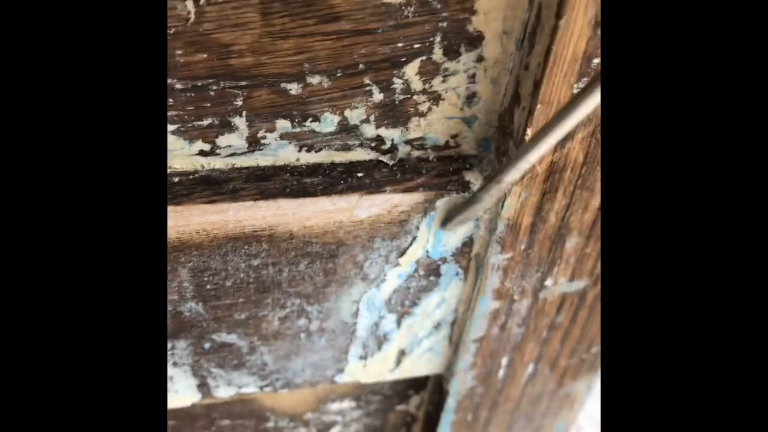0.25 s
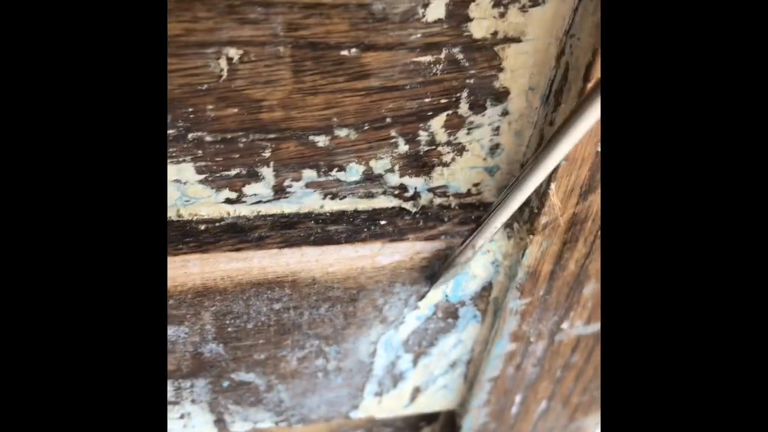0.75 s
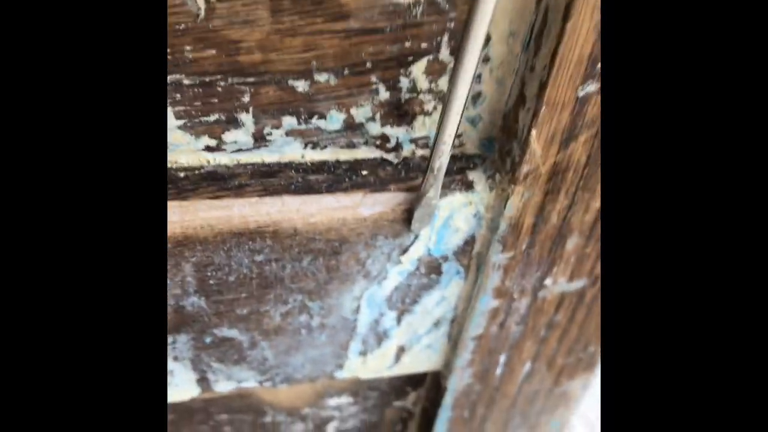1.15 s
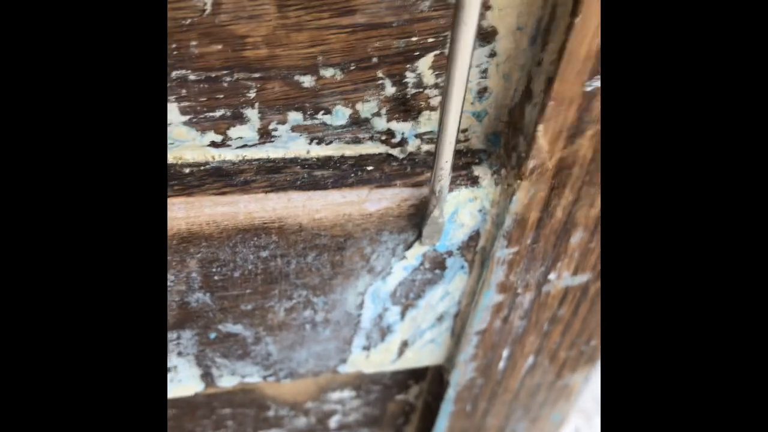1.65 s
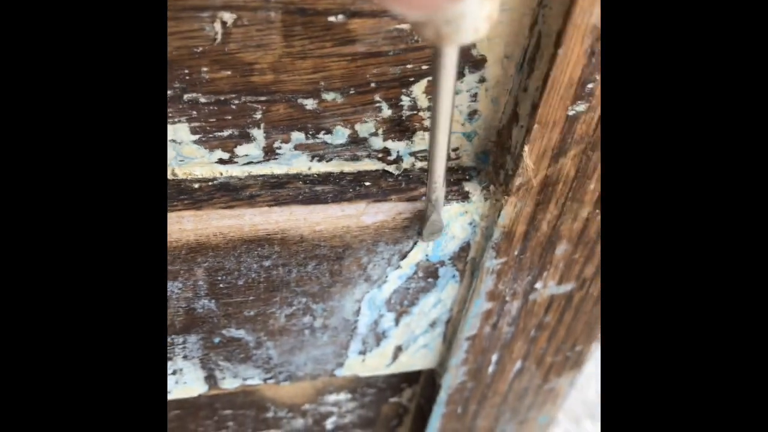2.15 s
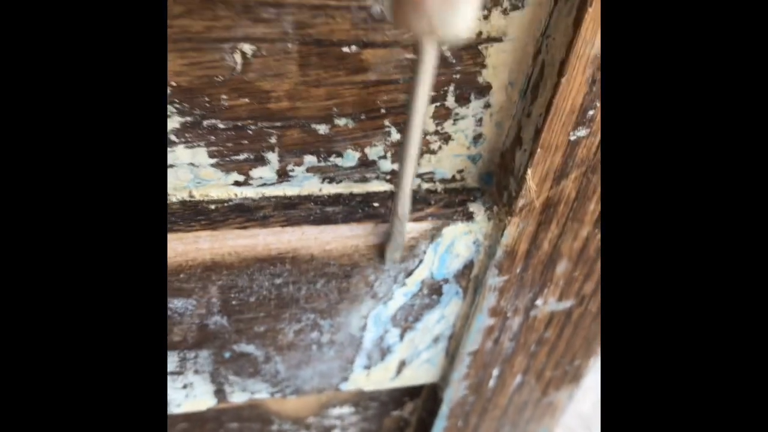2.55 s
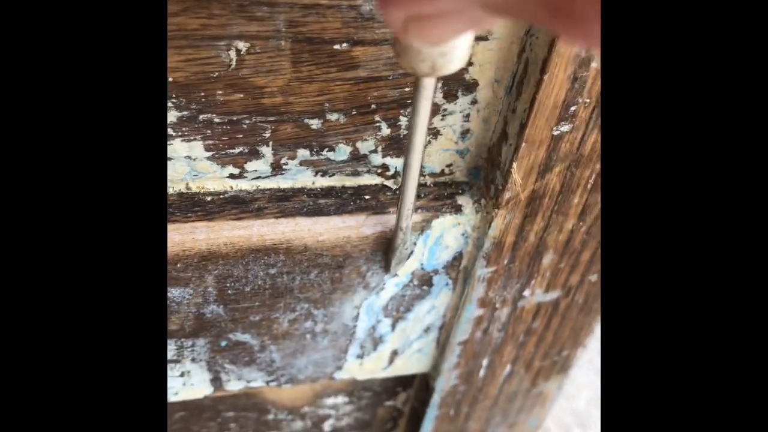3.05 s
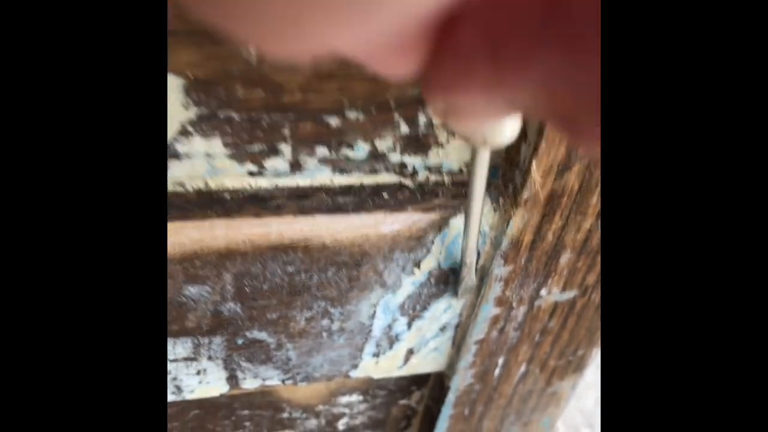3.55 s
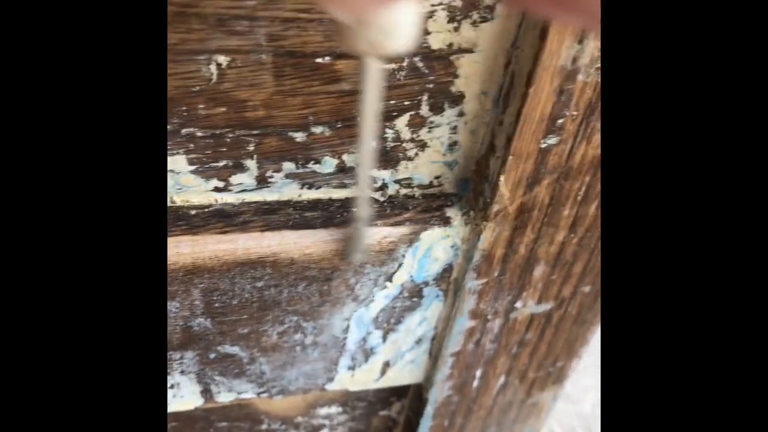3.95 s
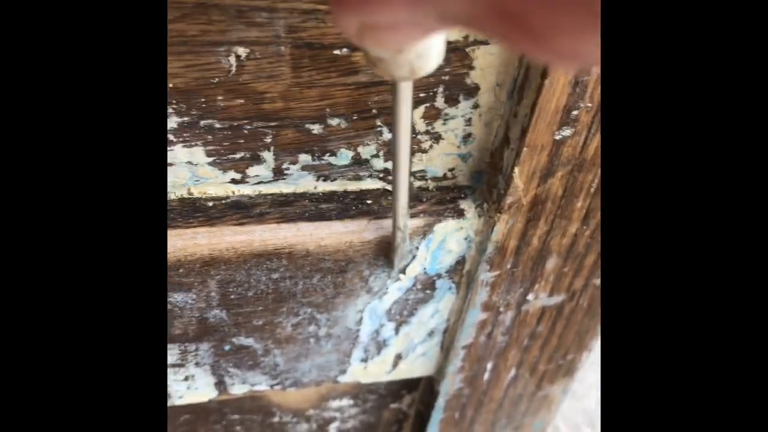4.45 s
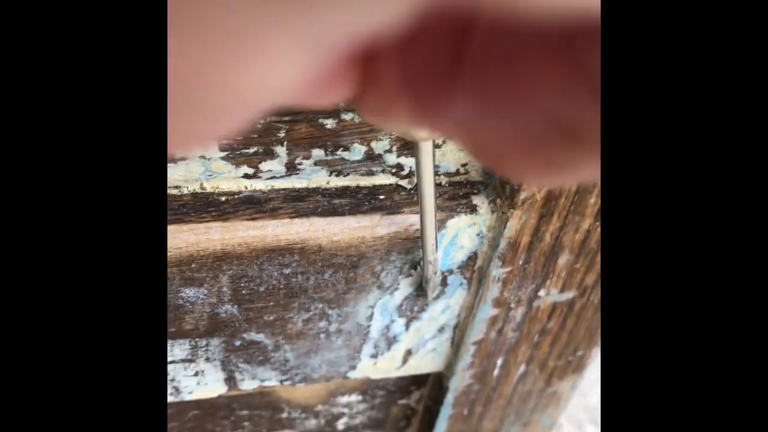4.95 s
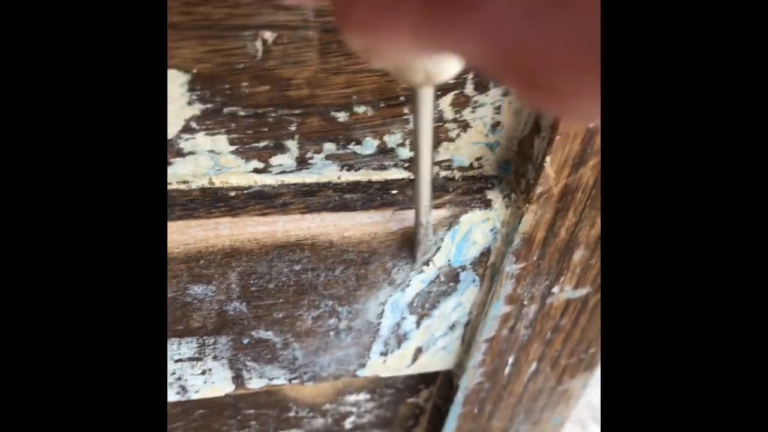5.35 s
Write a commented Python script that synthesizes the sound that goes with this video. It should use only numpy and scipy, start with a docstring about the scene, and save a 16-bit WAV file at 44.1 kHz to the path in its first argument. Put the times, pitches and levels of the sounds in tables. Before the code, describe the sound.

A pointed steel tool works at old paint on a wooden panel, heard very close in a quiet room. Faint jabs and dull knocks come first, then short gritty scrapes. Two harder knocks lead to cracking flakes; past the middle the point slips free with a loud, sharp snap. Smaller cracks and scrapes continue to the end over low hum and soft hand bumps.

```python
"""A pointed steel tool scrapes old paint off a wooden furniture panel, close by in a quiet room with hum and hiss.
A faint jab and a far peep open; dull, rubbed knocks follow as the tool is set down, then short gritty scrapes.
Two hard knocks lead into cracking flakes; past the middle the dug-in point slips free loudly with a big snap.
More flakes, jabs and scrapes follow to the end, over soft bumps and the clearest peep. Noise grains, cracks
and slips drive filters for paint, steel and wood; knocks are dispersed pulses, peeps are gliding sines."""
import sys
import numpy as np
from scipy import signal
from scipy.fft import rfft, irfft
from scipy.io import wavfile

SR = 44100
rng = np.random.default_rng(int(sys.argv[2]) if len(sys.argv) > 2 else 0)


def generate_wav(signal):
    """Clip the signal to [-1, 1] and save it as 16-bit WAV at the path in sys.argv[1]."""
    frames = np.transpose(np.atleast_2d(signal))
    scaled = np.clip(frames, -1, 1) * 32767
    pcm = np.round(scaled).astype(np.int16)
    wavfile.write(sys.argv[1], SR, pcm)


N = 247401
TIME_S = np.arange(N) / SR

# colour of the room's air: hz, gain_db
AIR_COLOUR = [(20, -23.5), (40, -8), (60, 11), (95, 0), (160, -2.5), (250, -6), (450, -9.5), (800, -17.5),
              (1600, -22), (3200, -25.5), (6300, -29.5), (9000, -30.5), (12000, -33), (16000, -36)]
AIR_DB = -62
HISS_DB, HISS_HZ, HISS_WIDTH_HZ = -78.5, 7640, 1060
# second harmonic of the hum, before HUM_GAIN_DB: time_s, level_db
HUM_SECOND = [(0.0, -57), (0.3, -60.5), (1.54, -71.5), (2.0, -63.5), (3.48, -66.5), (3.6, -70.5),
              (5.07, -61.5), (5.22, -56), (5.6, -61.5)]
MAINS_HZ, MAINS_DB, MAINS_WAVER_DB, HUM_GAIN_DB = 60.84, -68, 3, 1
# far peeps, before the direct and trail gains: start_s, pitch_hz, level_db, pitch_rise_share
FAR_PEEPS = [(.287, 2910, -72, .01), (1.069, 3100, -72.5, .01), (3.08, 3080, -71, .015),
             (4.326, 3080, -69, 0.018), (5.065, 3065, -63, .075)]
PEEP_LENGTH_S, PEEP_TRAIL_T60_S = 0.074, 0.2
ROOM_T60_S, ROOM_DB, ROOM_CUT_HZ = 0.099, -13.5, 1840
# soft bumps as the hand shifts its weight: start_s, level_db
HAND_BUMPS = [(.0, -47.5), (.298, -56.5), (1.041, -56.5), (1.304, -57.5), (1.809, -56.5), (1.976, -51),
              (2.909, -59), (3.182, -48), (4.037, -54.5), (4.164, -48.5), (4.49, -57), (4.604, -54.5),
              (4.882, -46.5), (4.94, -52), (5.33, -56), (5.507, -51)]
# colour of the bumps: hz, gain_db
BUMP_COLOUR = [(30, -36), (70, -9), (130, -2.5), (175, -3), (240, 7), (310, -10.5), (420, -10.5),
               (700, -28), (1500, -31), (4000, -53)]
BUMP_DECAY_S, WORK_RUMBLE_DB = 0.038, -56.5  # rumble left by a moderate stroke
# dull knocks as the tool is set down: start_s, peak_db
TOOL_KNOCKS = [(0.5297, -35), (0.6344, -33), (0.9579, -27), (1.2783, -30.5), (2.1022, -24), (2.2854, -18.5)]
# colour of a knock: pitch_multiple, gain_db
THUMP_COLOUR = [(.1, -18), (.3, -10), (.6, 2), (1, 5), (1.45, -0.5), (2.1, -10), (3, -30.5), (5, -40),
                (12, -88)]
# a harder knock is higher and has more tick
MIDDLING_DB, KNOCK_HZ, KNOCK_HZ_PER_DB = -22, 569, 7
TICK_DB, TICK_DB_PER_DB = -9, 0.82  # relative to the thump
# rasps as the point skates over bare wood: start_s, length_s, centre_hz, level_db
WOOD_RASPS = [(0.903, 0.1, 4200, -72.5), (1.23, 0.077, 3470, -67), (1.616, 0.031, 2870, -64),
              (1.644, 0.067, 3330, -73), (4.632, 0.24, 1200, -71), (4.68, .17, 3140, -76)]
RASP_WIDTH_HZ = 1440
# modes of the wooden panel: hz, gain_db, t60_s
PANEL_MODES = [(241.2, 14.5, 0.12), (305, 7, 0.034), (397, 8.5, 0.14), (497.6, 15, 0.066), (536, 9, 0.026),
               (637, 0, 0.101), (761.4, 11.5, 0.075), (906, 4, 0.053), (974, 3, 0.48), (1060, -2.5, 0.14),
               (1134, 2, 0.16), (1353, -36, 0.46), (1310, -4.5, 0.14), (1992, 0.5, 0.015), (2170, 6, 0.11),
               (2224, -11.5, 0.28), (2510, -12, 0.094)]
# resonances of the steel shaft: hz, width_hz, gain_db
SHAFT_MODES = [(3237, 140, 3.5), (4360, 330, 0.5), (5500, 39, -6), (6200, 160, -7), (8130, 315, 8),
               (12120, 820, -6.5)]
# twang of the steel as the point slips free: hz, width_hz, gain_db
TWANG_MODES = [(1160, 360, 3), (2360, 130, 11), (3410, 110, -0.5), (5420, 180, 5.5), (7900, 270, 11.5)]
# colour of crumbling paint: hz, gain_db
PAINT_COLOUR = [(60, -9.5), (200, -5), (450, -0.5), (1200, -1), (1650, -4.5), (2300, -2.5), (2800, -5.5),
                (4500, -10.5), (7000, -13.5), (9500, -15), (13000, -13), (16000, -17.5)]
# sharp snaps: paint flakes breaking, and at 2.2855 s the tick of the hardest knock:
# start_s, level_db, brightness_db, wood_bite_db
SHARP_SNAPS = [(1.186, -51, -12, 11.5), (1.976, -35, -17, 4), (2.2855, -32, -20, -19),
               (2.359, -35.5, -9, 13), (2.368, -36.5, 4.5, 8), (3.185, -48, -14, 2.5),
               (3.353, -47.5, 19, -6), (3.4105, -7, -6, -8.5), (3.7294, -33, -4, 6), (3.799, -29, -20, 10),
               (3.948, -39.5, 0, -4), (4.3012, -39.5, 5.5, 13.5), (5.3274, -29.5, -6, 17.5),
               (5.505, -29, 3.5, 5.5)]
SNAP_DECAY_S = 0.00099
# slips of the dug-in point: peak_s, level_db, brightness_db, wood_kick_db
POINT_SLIPS = [(3.3699, -23, 8, -28), (3.4094, -17.5, 10, -27)]
SLIP_RISE_S, SLIP_FALL_S, SPRING_LAG_S, SPRING_DECAY_S = 0.002, 0.0024, 0.0054, 0.0074
# scrapes, which swell and let go: start_s, length_s, crest_db, brightness_db
SCRAPE_STROKES = [(1.223, 0.093, -54, 0.5), (1.65, 0.08, -59.5, -20), (1.75, 0.11, -65, 10),
                  (1.974, 0.086, -68, 15.5), (2.105, 0.085, -55, 3.5), (2.349, 0.061, -41, -6),
                  (2.525, 0.11, -52, -1.5), (2.889, 0.042, -62, 9), (3.372, .03, -34.5, 4),
                  (3.583, 0.11, -67.5, 16), (3.658, 0.038, -49.5, -3), (3.697, 0.12, -45, -4.5),
                  (4.398, 0.077, -61.5, 4.5), (4.645, 0.23, -65.5, 5.5), (4.895, 0.069, -43, 1.5),
                  (5.111, 0.066, -54, 9.5), (5.304, .04, -48.5, 4), (5.45, 0.1, -47, 3)]
CREST_SHARE = 0.58  # where in its length a scrape is strongest
# jabs, which bite quickly and run out: start_s, fall_s, crest_db, brightness_db
JAB_STROKES = [(0.258, 0.043, -59, 5.5), (.429, 0.03, -58, 3), (.781, 0.013, -66, 11),
               (2.716, 0.051, -62, 11.5), (3.234, .04, -76, 19), (3.352, .012, -49, 6.5),
               (3.943, 0.048, -45, 1), (4.207, 0.012, -38.5, -4.5), (4.597, 0.022, -58.5, 7),
               (4.873, 0.0055, -47, -10), (5.283, 0.022, -53, 3.5)]
JAB_RISE_S = 0.0077
# force entering the wood: gain at a moderate stroke, loss for each dB of harder work
MODERATE_DB, BITE_DB, BITE_LOSS_DB_PER_DB = -53, 0, 0.26
CUTOFF_HZ = 15900


def from_db(db):
    """Decibels to amplitude."""
    return 10 ** (np.asarray(db) / 20)


def rms_one(x):
    """Scale to an RMS of 1."""
    return x / np.sqrt(np.mean(x ** 2) + 1e-20)


def butter(x, hz, kind, order=2):
    """Causal Butterworth filter."""
    sos = signal.butter(order, hz, kind, fs=SR, output="sos")
    return signal.sosfilt(sos, x + 1e-18)


def drift(rate_hz):
    """Straight lines between normal random knots, rate_hz knots a second."""
    knots = rng.standard_normal(N)
    return np.interp(TIME_S * rate_hz, np.arange(N), knots)


def resonance(x, hz, width_hz):
    """Two-pole resonance with a gain of about 1 at its peak."""
    r = np.exp(-np.pi * width_hz / SR)
    zeros = np.array([1, 0, -1]) * (1 - r * r) / 2
    poles = [1, -2 * r * np.cos(2 * np.pi * hz / SR), r * r]
    return signal.lfilter(zeros, poles, x + 1e-18)


def colour(x, spectrum, size=4096):
    """Minimum-phase filter that follows a short spectrum."""
    hz, db = np.transpose(spectrum)
    grid_hz = np.maximum(np.arange(size // 2 + 1) * SR / size, 1)
    gain = from_db(np.interp(np.log(grid_hz), np.log(hz), db))
    cepstrum = irfft(np.log(gain))
    # fold the cepstrum to make the filter causal
    cepstrum[1:size // 2] *= 2
    cepstrum[size // 2 + 1:] = 0
    response = irfft(np.exp(rfft(cepstrum)))
    return signal.fftconvolve(x, response)[:N]


def dying(start_s, decay_s):
    """Envelope that jumps to 1 and decays exponentially."""
    age_s = TIME_S - start_s
    return (age_s >= 0) * np.exp(-np.clip(age_s / decay_s, 0, 40))


def brighten(grit, force, bright_force, split_hz=6000):
    """Grit split in two bands, the treble with a strength of its own."""
    low = butter(grit, split_hz, "low") * force
    high = butter(grit, split_hz, "high") * bright_force
    return low - high


def background(wander_rad=0.76, hiss_drift_hz=260, hiss_waver_db=2):
    """Room air, a narrow high hiss that wanders, and a wavering mains hum."""
    air = from_db(AIR_DB) * rms_one(colour(rng.standard_normal(N), AIR_COLOUR))
    centre_hz = HISS_HZ + hiss_drift_hz * drift(22)
    carrier = np.sin(2 * np.pi * np.cumsum(centre_hz) / SR)
    hiss = rms_one(butter(rng.standard_normal(N), HISS_WIDTH_HZ / 2, "low") * carrier)
    hiss *= from_db(HISS_DB + hiss_waver_db * drift(16))
    phase = 2 * np.pi * MAINS_HZ * TIME_S + wander_rad * drift(6.2)
    second_db = HUM_GAIN_DB + np.interp(TIME_S, *np.transpose(HUM_SECOND))
    first = from_db(MAINS_DB + MAINS_WAVER_DB * drift(25)) * np.sin(phase)
    second = from_db(second_db) * np.sin(2 * phase)
    return air + hiss + np.sqrt(2) * (first + second)  # hum levels are RMS


def peeps(trail_db=-2.0, direct_db=-4, blur_hz=120, blur=1.0):
    """Faint thin whistles that rise a little, blurred by noise and an echo trail as if far off."""
    out = np.zeros(N)
    for start_s, hz, db, rise in FAR_PEEPS:
        on = (TIME_S > start_s) & (TIME_S < start_s + PEEP_LENGTH_S)
        part = (TIME_S[on] - start_s) / PEEP_LENGTH_S
        pitch_hz = hz * (1 + rise * (part - 0.5))
        swell = np.sqrt(2 * np.sin(np.pi * part))
        out[on] += from_db(db) * swell * np.sin(2 * np.pi * np.cumsum(pitch_hz) / SR)
    out *= rms_one(1 + blur * rms_one(butter(rng.standard_normal(N), blur_hz, "low")))
    age_s = TIME_S[:SR // 2]
    trail = rng.standard_normal(len(age_s)) * from_db(-60 * age_s / PEEP_TRAIL_T60_S)
    echoes = signal.fftconvolve(out, trail / np.linalg.norm(trail))[:N]
    return from_db(direct_db) * out + from_db(trail_db) * echoes


def room(x, gap_s=0.00227, bright_db=-17, bright_t60_s=0.095):
    """Short noise tail of reflections; its weak wideband part dies slightly sooner than its dull part."""
    age_s = TIME_S[:SR // 2]
    dull, bright = rng.standard_normal((2, len(age_s))) * (age_s > gap_s)
    tail = butter(dull, ROOM_CUT_HZ, "low", order=4) * from_db(-60 * age_s / ROOM_T60_S)
    tail += bright * from_db(bright_db - 60 * age_s / bright_t60_s)
    return from_db(ROOM_DB) * signal.fftconvolve(x, tail / np.linalg.norm(tail))[:N]


def bumping(tip, soften_hz=45, give=0.81):
    """The piece rumbles under the hand and after each push of the tool, giving less to the hardest."""
    keep = np.exp(-1 / (BUMP_DECAY_S * SR))
    smooth_force = signal.lfilter([1 - keep], [1, -keep], np.abs(tip) + 1e-18)
    effort = smooth_force / from_db(MODERATE_DB)
    push = from_db(WORK_RUMBLE_DB) * effort ** give
    push += sum(from_db(db) * dying(start_s, BUMP_DECAY_S) for start_s, db in HAND_BUMPS)
    rumble = rms_one(colour(rng.standard_normal(N), BUMP_COLOUR))
    return butter(push, soften_hz, "low", order=1) * rumble


def rubbing(rub_db=-23, lead_s=0.0051, low_hz=350, high_hz=1200):
    """Dull friction noise that swells into each knock and fades as fast after it."""
    press = np.zeros(N)
    for start_s, db in TOOL_KNOCKS:
        distance = np.abs(TIME_S - start_s) / lead_s
        press += from_db(db + rub_db) * np.exp(-np.clip(distance, 0, 40))
    return press * rms_one(butter(rng.standard_normal(N), [low_hz, high_hz], "band"))


def knocking(travel_s=0.00419, tick_low_hz=900, tick_high_hz=1900, rebound_s=0.00322,
             rebound_db=-15, size=4096):
    """A small tick at contact, a bending wave through the wood, highs first, and its return from the frame."""
    out = np.zeros(N)
    grid_hz = np.maximum(np.arange(size // 2 + 1) * SR / size, 1)
    tick = butter(signal.unit_impulse(size), [tick_low_hz, tick_high_hz], "band")
    multiples, thump_db = np.transpose(THUMP_COLOUR)
    for start_s, db in TOOL_KNOCKS:
        hz = KNOCK_HZ + KNOCK_HZ_PER_DB * (db - MIDDLING_DB)
        tick_db = TICK_DB + TICK_DB_PER_DB * (db - MIDDLING_DB)
        gain = from_db(np.interp(np.log(grid_hz / hz), np.log(multiples), thump_db))
        # bending waves speed up with the root of frequency
        lag_cycles = 2 * travel_s * np.sqrt(grid_hz * hz)
        thump = irfft(gain * np.exp(-2j * np.pi * lag_cycles))
        parts = [(start_s, tick, db + tick_db),
                 (start_s, thump, db),
                 (start_s + rebound_s, thump, db + rebound_db)]
        for part_s, shape, peak_db in parts:
            i = int(part_s * SR)
            out[i:i + size] += from_db(peak_db) * shape / np.abs(shape).max()
    return out


def rasping():
    """Dry, narrow friction noise that rises and falls with the movement."""
    out = np.zeros(N)
    for start_s, length_s, hz, db in WOOD_RASPS:
        part = np.clip((TIME_S - start_s) / length_s, 0, 1)
        swell = np.sqrt(np.abs(np.sin(np.pi * part)))
        band = resonance(rng.standard_normal(N), hz, RASP_WIDTH_HZ)
        band = resonance(band, hz, 2 * RASP_WIDTH_HZ)
        out += from_db(db) * swell * rms_one(band)
    return out


def panel(x):
    """The wood rings in its modes, each with its own decay."""
    return sum(from_db(db) * resonance(x, hz, np.log(1000) / (np.pi * t60_s))
               for hz, db, t60_s in PANEL_MODES)


def shaft(x):
    """The hand damps the steel, which broadens its resonances."""
    return sum(from_db(db) * resonance(x, hz, width_hz) for hz, width_hz, db in SHAFT_MODES)


def twanging(skid):
    """The skid of the freed point excites the steel."""
    return sum(from_db(db) * resonance(skid, hz, width_hz) for hz, width_hz, db in TWANG_MODES)


def snapping(jolt=1.44, click=1.4):
    """A sharp crack of about a millisecond that jolts the panel: sound at the tip, force on the wood."""
    cracks = np.array([from_db(db) * dying(start_s, SNAP_DECAY_S) for start_s, db, _, _ in SHARP_SNAPS])
    brightness, bite = from_db(np.array(SHARP_SNAPS)[:, 2:].T)
    splinters = rng.choice([-1., 1.], N)
    force = cracks.sum(0)
    push = bite @ cracks
    # upward jumps at the onset of each crack
    onset, release = np.maximum(np.diff([force, push], prepend=0), 0)
    tip = brighten(splinters, force, brightness @ cracks) + click * onset
    return np.array([tip, splinters * push / 2 + jolt * release])


def slipping():
    """The point skids a few milliseconds, then the bent panel springs back: tip sound, force on the wood."""
    force, bright_force, wood_force = np.zeros((3, N))
    for peak_s, db, bright_db, kick_db in POINT_SLIPS:
        age_s = TIME_S - peak_s
        loss = np.where(age_s < 0, (age_s / SLIP_RISE_S) ** 2, age_s / SLIP_FALL_S)
        skid = from_db(db) * np.exp(-np.minimum(loss, 40))
        force += skid
        bright_force += skid * from_db(bright_db)
        wood_force += from_db(kick_db) * dying(peak_s + SPRING_LAG_S, SPRING_DECAY_S)
    grit = rng.choice([-1., 1.], N)
    return np.array([brighten(grit, force, bright_force), grit * wood_force])


def catches(per_s=70, size=1.05, decay_s=0.0028):
    """The point catches on ridges of paint: brief surges of force over a steady drag."""
    surges = (rng.random(N) < per_s / SR) * rng.uniform(0, 2 * size, N)
    keep = np.exp(-1 / (decay_s * SR))
    return rms_one(1 + signal.lfilter([1], [1, -keep], surges + 1e-18))


def scraping(grains_per_s=6000, grain_db=0.5, judder_db=2.0, judder_rate_hz=260, onset_db=11,
             release_db=9, lift=0.52, sheen_db=2.0):
    """Each stroke crushes a dense, juddering stream of paint grains: sound at the tip, force on the wood."""
    sizes = from_db(grain_db * np.minimum(rng.exponential(1, N), 4)) * rng.choice([-1, 1], N)
    struck = rng.random(N) < grains_per_s / SR
    grit = rms_one(sizes * struck * from_db(judder_db * drift(judder_rate_hz)))
    strokes = [(start_s, CREST_SHARE * length_s, (1 - CREST_SHARE) * length_s, db, bright_db)
               for start_s, length_s, db, bright_db in SCRAPE_STROKES]
    strokes += [(start_s, JAB_RISE_S, fall_s, db, bright_db)
                for start_s, fall_s, db, bright_db in JAB_STROKES]
    force, bright_force, wood_force = np.zeros((3, N))
    for start_s, rise_s, fall_s, db, bright_db in strokes:
        # touch, onset, crest, release, lifted
        steps_s = [-lift * rise_s / 2, lift * rise_s / 2, rise_s, fall_s, lift * fall_s]
        corners_s = start_s + np.cumsum(steps_s)
        on = (TIME_S > corners_s[0]) & (TIME_S < corners_s[-1])
        shape_db = np.interp(TIME_S[on], corners_s, [-35, -onset_db, 0, -release_db, -35])
        swell = from_db(db + shape_db)
        force[on] += swell
        bright_force[on] += swell * from_db(bright_db)
        wood_force[on] += swell * from_db(BITE_DB - BITE_LOSS_DB_PER_DB * (db - MODERATE_DB))
    bright_force *= from_db(sheen_db * drift(120))  # hard and soft patches of paint
    return np.array([brighten(grit, force, bright_force), grit * wood_force])


def scene(knock_ring_db=-22, ping_hz=4300, ping_width_hz=500, ping_db=5):
    """Tool work sounds through paint, steel, wood and room; knocks are nearly dead, with a brief steel ping."""
    slips = slipping()
    contact = scraping() * catches() + slips + snapping()
    tip, on_wood, skid = (colour(x, PAINT_COLOUR) for x in (*contact, slips[0]))
    work = tip + shaft(tip) + twanging(skid) + rasping() + panel(on_wood)
    knocks = knocking() + rubbing()
    knock_ring = from_db(knock_ring_db) * panel(knocks)
    ping = from_db(ping_db) * resonance(knocks, ping_hz, ping_width_hz)
    close = work + room(work) + knocks + knock_ring + ping + bumping(contact[0])
    return (close + peeps() + background())[None]


def record(dry, low_cut_hz=36):
    """The microphone drops the deepest bass; the top is cut steeply."""
    thin = butter(dry, low_cut_hz, "high", order=4)
    top_cut = signal.ellip(10, 0.1, 80, CUTOFF_HZ, fs=SR, output="sos")
    return signal.sosfilt(top_cut, thin)


dry = scene()
out = record(dry)
generate_wav(out)
```